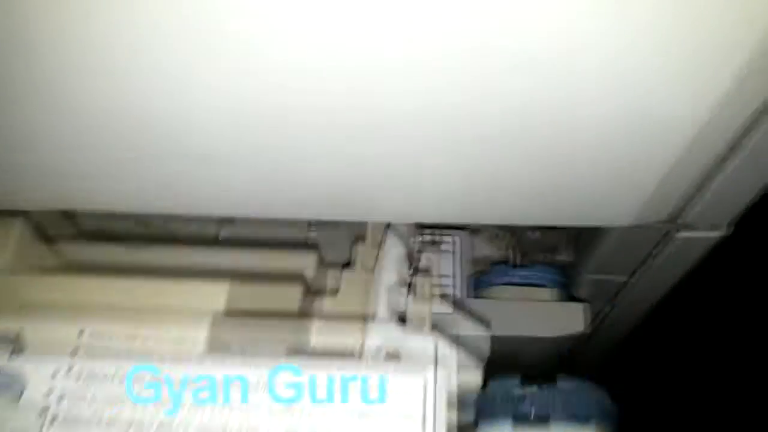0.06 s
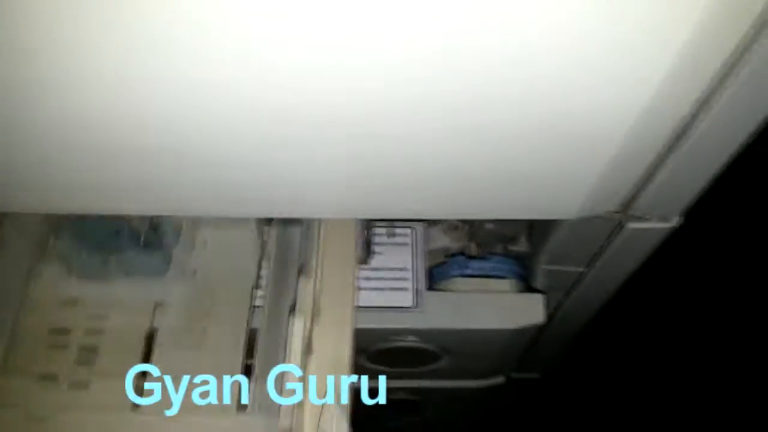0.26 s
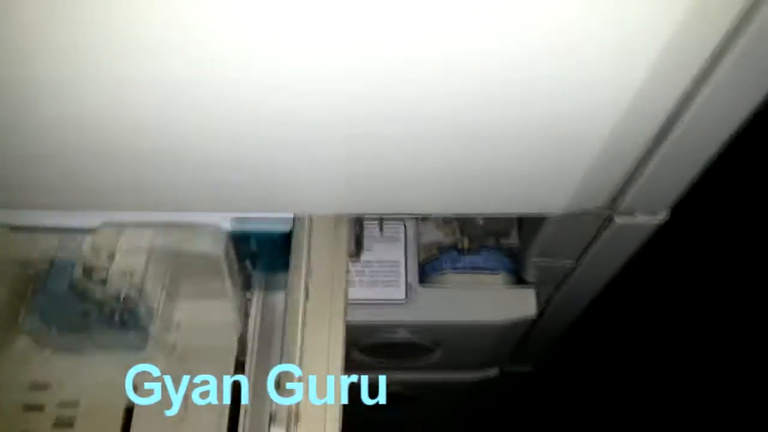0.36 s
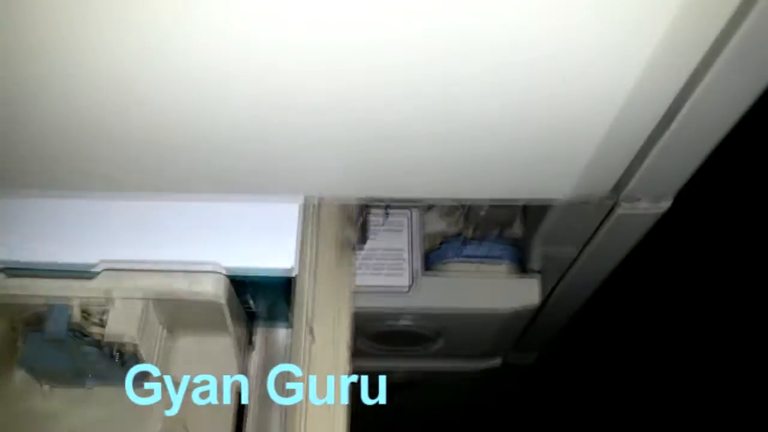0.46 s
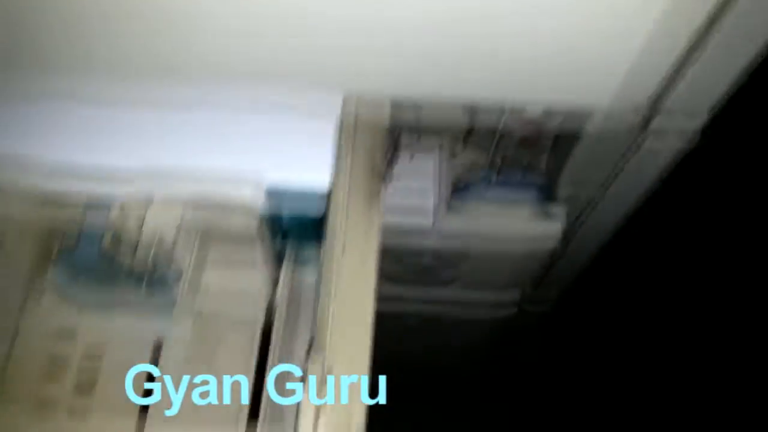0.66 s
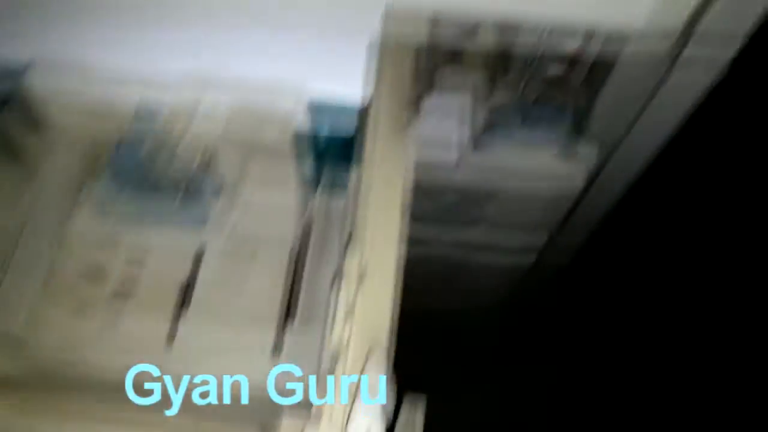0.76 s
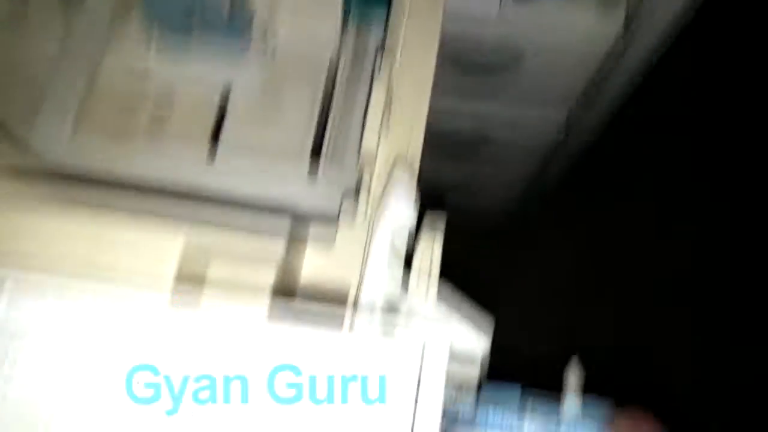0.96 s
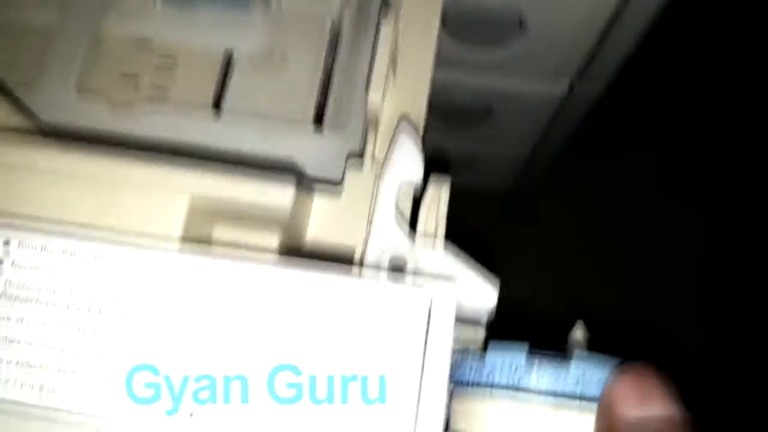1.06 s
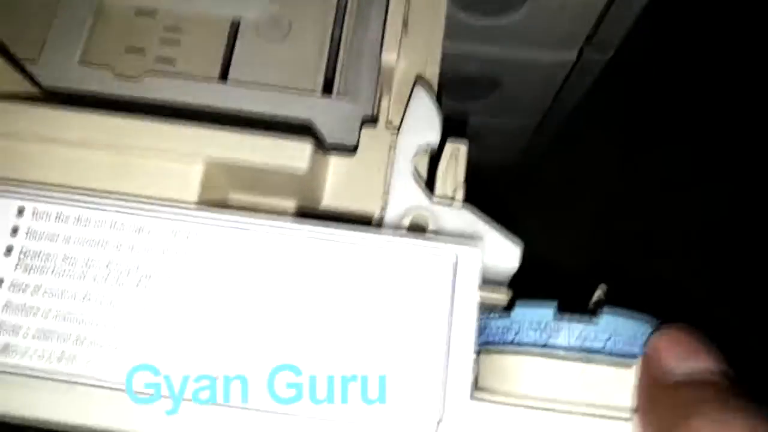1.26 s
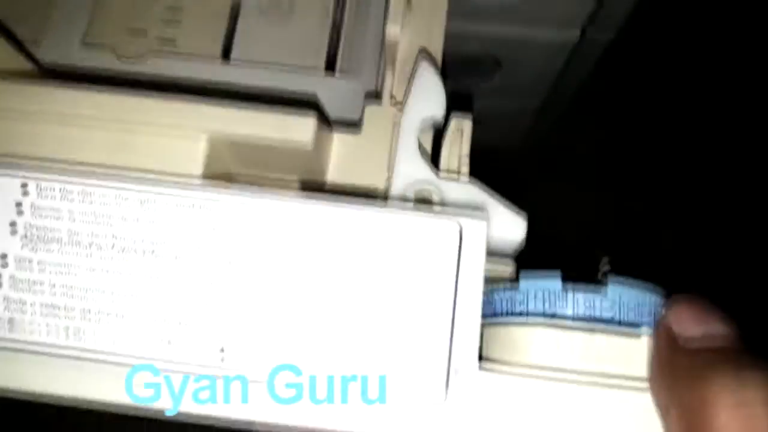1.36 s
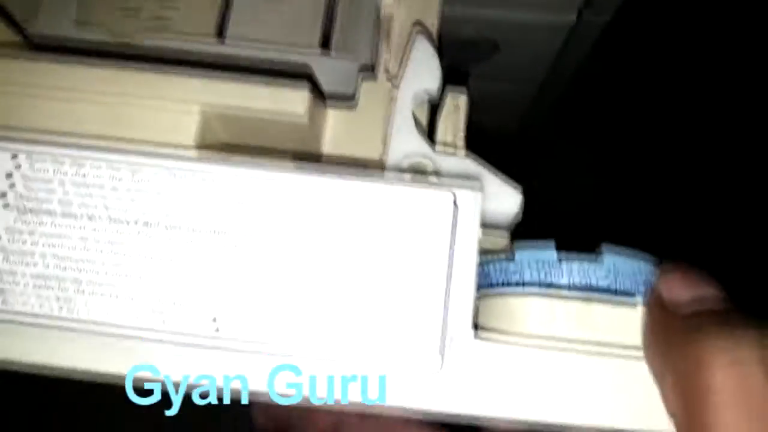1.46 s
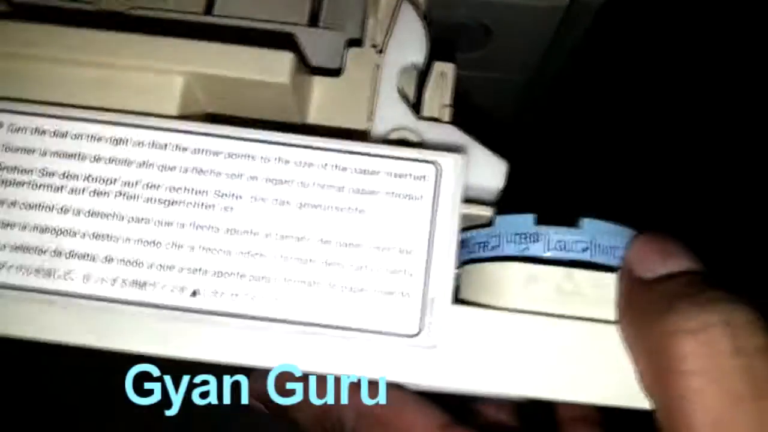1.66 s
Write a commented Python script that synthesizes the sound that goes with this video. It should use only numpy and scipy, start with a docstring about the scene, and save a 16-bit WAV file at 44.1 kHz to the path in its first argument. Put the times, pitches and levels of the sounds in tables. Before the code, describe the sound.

Plastic paper drawer slides noisily on its rails, clacks hard over a catch, then settles quietly

```python
"""In a small office, a copier's plastic paper drawer is pulled out, close to the microphone.
It rubs, rumbles and squeaks on its rails (shaped noise, rough tones), knocks (noise bursts with a ring),
clacks and thuds over a catch (decaying modes) and glides to rest with paper rustle and light ticks.
Ventilation noise and a faint motor whine lie beneath; the loudest clacks overload the microphone."""
import sys
import numpy as np
from scipy import signal
from scipy.fft import rfft, irfft, next_fast_len
from scipy.io import wavfile
from scipy.ndimage import map_coordinates

SR = 44100
rng = np.random.default_rng(int(sys.argv[2]) if len(sys.argv) > 2 else 0)


def master_out(mix):
    """Clip the mix to full scale and print it as 16-bit PCM to the path in sys.argv[1]."""
    frames = np.transpose(np.atleast_2d(mix))
    ceiling = np.clip(frames, -1, 1)
    pcm = np.round(ceiling * 32767).astype(np.int16)
    wavfile.write(sys.argv[1], SR, pcm)


N = 74970
T = np.arange(N) / SR  # time of each sample, s

# Office noise spectrum [f/Hz, density/dB]
OFFICE_COLOUR = [(15, -47), (25, -26), (50, -11), (70, -4), (98, -4.5), (135, -0.5), (167, -24), (195, -7),
                 (237, -6), (529, -12), (600, -13.5), (1060, -27), (2000, -19), (4000, -31.5), (8000, -43),
                 (13800, -31), (15000, -56)]
# Steady hum and motor lines [f/Hz, rms level/dB]
HUM = [(102.3, -57.5), (200, -59), (269.2, -59), (538.3, -62), (1077, -66.5), (1620, -67.5), (3235, -71.5),
       (4856, -73), (7278, -81), (9706, -79)]
OFFICE_DB, HUM_DRIFT_RAD = -51.5, 1

# Mean level of the rubbing on the rails [t/s, level/dB]
RUB_LEVEL = [(0, -32), (.08, -33.5), (.19, -27.5), (.25, -26.5), (.33, -19.5), (.38, -20.5), (.445, -21.5),
             (.475, -29), (.53, -31), (.58, -37), (.655, -41.5), (.69, -50.5), (.78, -50), (.86, -45),
             (.95, -53), (1.1, -55.5), (1.38, -55.5), (1.7, -60)]
# Level of the tray's rumble [t/s, level/dB]
RUMBLE_LEVEL = [(0, -37.5), (.2, -32.5), (.33, -40), (.43, -29), (.5, -38.5), (.64, -38), (.74, -49.5),
                (.92, -52), (1.08, -54.5), (1.25, -62.5), (1.7, -55)]
# Rubbing spectrum before the tray's resonances [f/Hz, density/dB]
RUB_COLOUR = [(150, -28), (250, -15), (292, -12.5), (761, -2), (829, -2), (888, -2.5), (2130, 0),
              (3100, -9), (5750, -25), (7560, -23.5), (8670, -31.5), (12200, -25), (15000, -34.5)]
# Rumble spectrum [f/Hz, density/dB]
RUMBLE_COLOUR = [(30, -70), (60, -27), (95, -4), (140, -10.5), (170, 0), (205, -8.5), (300, -10.5),
                 (600, -13.5), (2000, -66)]
# Resonances of the plastic tray [f/Hz, width/Hz, gain/dB]
TRAY = [(636.3, 45, 1), (735, 13, 2.5), (927, 70, -0.5), (1184, 84, -7.5), (1337, 13, -3), (1770, 13.3, -4),
        (2143, 17, -12), (2515, 13.3, 5), (3000, 40, -21), (3580, 180, -8.5), (7680, 170, 4)]
SLIPS_PER_S, SLIP_DB, SLIP_SPREAD_DB, RUB_WOBBLE_DB = 700, -5.5, 5, 1.5

# Level of the paper stack's rustle [t/s, level/dB]
RUSTLE_LEVEL = [(.74, -64), (.775, -57.5), (.83, -52), (.87, -59.5), (.93, -62), (1.1, -71.5), (1.7, -68)]
# Rustle spectrum [f/Hz, density/dB]
RUSTLE_COLOUR = [(1500, -12), (2600, 4.5), (4300, 5), (5500, -7), (7100, 3), (8800, -7), (11500, -4),
                 (15000, -12)]

# Tray against rails [t/s, level/dB, lower edge f/Hz, upper edge f/Hz, noise t60/s, ring f/Hz]
KNOCKS = [(.001, -25.5, 308, 2500, 0.14, 756), (0.094, -29.5, 1940, 6000, 0.18, 2800),
          (0.155, -26.5, 2030, 6500, 0.053, 2690), (0.177, -27.5, 1850, 5560, 0.067, 3250),
          (0.1919, -19.5, 1900, 8000, 0.035, 3160), (0.2038, -16.5, 684, 4800, 0.11, 1745),
          (0.2282, -16.5, 700, 9000, 0.073, 2054), (0.2804, -14.5, 930, 9200, 0.056, 2220),
          (.326, -20.5, 600, 14000, 0.055, 890), (.341, -21, 3000, 12000, 0.013, 3770),
          (0.3485, -18, 2200, 14000, 0.004, 2480), (0.399, -22.5, 500, 2940, 0.039, 1620),
          (0.4329, -15.5, 485, 2780, 0.073, 1172), (.492, -24, 1200, 8600, 0.098, 2253),
          (0.611, -32.5, 895, 2950, 0.054, 2120), (0.807, -30, 520, 1970, 0.043, 810),
          (0.846, -50, 493, 2400, 0.074, 1410), (0.982, -31, 1320, 3000, 0.081, 2470),
          (1.048, -48.5, 903, 3040, 0.047, 1300), (1.399, -47, 980, 2840, 0.069, 1426),
          (1.549, -37, 710, 1800, 0.1, 577), (1.641, -40.5, 1110, 2600, 0.084, 1343),
          (1.664, -33.5, 1300, 2880, 0.067, 1960), (1.673, -39.5, 1270, 2850, 0.046, 1340)]
# Knock spectrum before the tray's resonances and the band edges [f/Hz, density/dB]
KNOCK_COLOUR = [(100, -78), (400, -6), (700, -10.5), (1300, -7), (2500, -8), (4000, -16.5), (5700, -24.5),
                (7400, -22.5), (9000, -26.5), (15000, -20)]
KNOCK_ATTACK_S = 0.0012
KNOCK_RING_DB, KNOCK_RING_LONGER = -4, 1.1  # ring level and t60 ratio, relative to the noise

# Decay of the office's reverberation [f/Hz, t60/s]
ROOM = [(150, 0.37), (1500, 0.26), (6000, 0.18), (14000, .17)]
ROOM_DB = -8.5

# Plastic squeaks on the rails [t/s, length/s, level/dB, f/Hz]
SQUEAKS = [(0.262, 0.019, -20.5, 1130), (0.628, 0.0068, -41, 3680), (0.652, 0.026, -43, 3300),
           (.704, 0.0074, -42.5, 2850)]
SQUEAK_ROUGH_RAD = 0.17

# Bumps over the catch [t/s, swell/s, panel hold/s, panel f/Hz, panel level/dB,
# catch f/Hz, catch level/dB, scrape level/dB]
CLACKS = [(0.2955, 0.0063, .014, 752.6, -7.5, 2196, -5.5, -12.5),
          (0.3355, 0.0089, 0.0073, 747.3, -6.5, 2342, -3, -16),
          (0.365, 0.0059, .009, 789, -8, 2416, -15.5, -39),
          (.385, .003, .002, 774, -13.5, 2226, -27, -29.5)]
# Modes of the catch; each bump shifts all f by one ratio [f before the shift/Hz, relative level/dB, t60/s]
CATCH_MODES = [(1524, -7.5, 0.13), (2228, -2.5, 0.096), (2060, -10, 0.068), (3007, -16.5, 0.096),
               (3540, -21.5, .06), (3802, -21.5, 0.026)]
# Scrape spectrum [f/Hz, density/dB]
SCRAPE_COLOUR = [(150, -18), (500, -27), (900, -2), (2300, 0), (3000, 1), (3800, 0.5), (5000, -13.5),
                 (7000, -9), (9000, -33), (12500, -14.5), (15500, -36)]
PANEL_T60_S, SCRAPE_T60_S = 0.034, 0.06
MODE_FLUTTER_DB, MODE_ROUGH_RAD = 0.8, 0.25

# Low thuds of the tray on the catch [t/s, level/dB, f/Hz, t60/s]
THUDS = [(.336, -39, 41.6, .05), (0.346, -24, 167.2, 0.14), (0.4, -23, 167.5, 0.073),
         (.43, -29.5, 114.5, 0.16)]
THUD_ATTACK_S = 0.012

# Small sharp plastic ticks [t/s, level/dB]
TICKS = [(0.6573, -30), (0.741, -43), (.765, -52)]
# Tick spectrum [f/Hz, density/dB]
TICK_COLOUR = [(1000, -14), (3000, 3), (5300, -35), (7000, 1), (8300, -5.5), (9900, 12), (11200, 4),
               (12300, 5), (15000, -7)]
TICK_ATTACK_S, TICK_T60_S = 0.00062, 0.022

# Microphone: overload amplitude, sharpness of the limiting, band limit
CLIP_TOP, CLIP_HARDNESS, TOP_HZ = 1.03, 17, 15644


def amp(db):
    """Level: decibels express the logarithm of an amplitude ratio."""
    return 10 ** (np.asarray(db) / 20)


def unit(x):
    """Normalization: division by the root mean square gives rms 1."""
    return x / np.sqrt(np.mean(x ** 2) + 1e-20)


def along(points, hz):
    """Logarithmic interpolation: (f, value) points are joined on a log-frequency axis."""
    f, value = np.transpose(points)
    return np.interp(np.log(hz + 1), np.log(f + 1), value)


def curve(points):
    """Linear interpolation: (t, value) points are read at every sample."""
    return np.interp(T, *np.transpose(points))


def wobble(rate):
    """Random modulation: a smooth curve through normal deviates, rate knots a second."""
    return map_coordinates(rng.standard_normal(2048), [T * rate], mode="mirror")


def filtered(x, response):
    """Linear filtering: the spectrum is multiplied by a response of frequency."""
    size = next_fast_len(N + SR // 2)
    spectrum = rfft(x, size) * response(np.fft.rfftfreq(size, 1 / SR))
    return irfft(spectrum, size)[:N]


def noise(response):
    """Coloured noise: white noise filtered by a response, at rms 1."""
    return unit(filtered(rng.standard_normal(N), response))


def colour(points):
    """Spectral envelope: (f/Hz, level/dB) points become an amplitude response."""
    return lambda hz: amp(along(points, hz))


def tray_body(hz):
    """Modal superposition: the tray's resonances add to a flat response."""
    response = 1
    for centre, width, db in TRAY:
        damping = 1j * hz * width
        response = response + amp(db) * damping / (centre * centre - hz * hz + damping)
    return response


def burst(start, attack, t60, hold=0):
    """Transient contact: the envelope rises straight, holds, then decays exponentially."""
    rise = np.clip((T - start) / attack, 0, 1)
    decay_time = np.maximum(T - start - attack - hold, 0)
    return rise * amp(-60 * decay_time / t60)


def tone(hz, start=0, phase=0):
    """Simple harmonic motion: a sine from a start time, with an added phase in radians."""
    return np.sin(2 * np.pi * hz * (T - start) + phase)


def office():
    """Broadband and tonal sources: ventilation noise joins slightly unsteady motor lines."""
    out = amp(OFFICE_DB) * noise(colour(OFFICE_COLOUR))
    for hz, db in HUM:
        drift = HUM_DRIFT_RAD * wobble(rate=8.1)
        out += amp(db) * np.sqrt(2) * tone(hz, phase=drift)  # sqrt 2 turns rms into peak
    return out


def slide():
    """Friction excitation: tiny slips on the rails excite the tray's resonances."""
    slip_times = rng.random(N) < SLIPS_PER_S / SR
    signs = rng.choice([-1, 1], N)
    sizes = amp(SLIP_SPREAD_DB * np.minimum(rng.exponential(size=N), 3))
    slips = slip_times * signs * sizes
    friction = rng.standard_normal(N) + amp(SLIP_DB) * unit(slips)
    rub = unit(filtered(friction, lambda hz: colour(RUB_COLOUR)(hz) * tray_body(hz)))
    return rub * amp(curve(RUB_LEVEL) + RUB_WOBBLE_DB * wobble(rate=51))


def rumble():
    """Whole-body vibration: the moving tray radiates low-frequency noise."""
    return amp(curve(RUMBLE_LEVEL)) * noise(colour(RUMBLE_COLOUR))


def rustle():
    """Superposed small contacts: the paper stack's noise swells as the drawer slows."""
    return amp(curve(RUSTLE_LEVEL)) * noise(colour(RUSTLE_COLOUR))


def knocks():
    """Impact excitation: light parts lack bass, softer contacts are duller, and each rings one small part."""
    out = np.zeros(N)
    for start, db, low_hz, high_hz, t60, ring_hz in KNOCKS:
        def response(hz):
            low_ratio = (hz / low_hz) ** 2
            band = low_ratio / np.hypot(1, low_ratio) / (1 + (hz / high_hz) ** 4)
            return colour(KNOCK_COLOUR)(hz) * tray_body(hz) * band

        out += amp(db) * burst(start, KNOCK_ATTACK_S, t60) * noise(response)
        ring = burst(start, KNOCK_ATTACK_S, t60 * KNOCK_RING_LONGER) * tone(ring_hz, start)
        out += amp(db + KNOCK_RING_DB) * ring
    return out


def room(x):
    """Reverberation: convolution with a noise tail in which each frequency decays at its own rate."""
    hz, t, z = signal.stft(rng.standard_normal(SR // 2), SR, nperseg=256)
    decay = amp(-60 * t / along(ROOM, hz)[:, None])
    tail = signal.istft(z * decay, SR, nperseg=256)[1]
    return signal.fftconvolve(x, tail / np.linalg.norm(tail))[:N]  # tail of unit energy


def squeaks():
    """Stick-slip oscillation: brief tones swell and fade with a rough phase."""
    out = np.zeros(N)
    for start, length, db, hz in SQUEAKS:
        swell = np.sin(np.pi * np.clip((T - start) / length, 0, 1))
        out += amp(db) * swell * tone(hz, phase=SQUEAK_ROUGH_RAD * wobble(rate=130))
    return out


def chatter(hz, start):
    """Intermittent contact: rattling keeps a mode's level and phase unsteady."""
    flutter = amp(MODE_FLUTTER_DB * wobble(rate=250))
    return flutter * tone(hz, start, MODE_ROUGH_RAD * wobble(rate=220))


def catch():
    """Forced and free vibration: each bump scrapes, drives the panel while it lasts and rings the catch."""
    out = np.zeros(N)
    reference_hz = CATCH_MODES[1][0]  # the strongest mode sets the catch's pitch
    for start, swell, hold, panel_hz, panel_db, catch_hz, catch_db, scrape_db in CLACKS:
        out += amp(panel_db) * burst(start, swell, PANEL_T60_S, hold) * chatter(panel_hz, start)
        for hz, mode_db, t60 in CATCH_MODES:
            mode = chatter(hz * catch_hz / reference_hz, start)
            out += amp(catch_db + mode_db) * burst(start, swell, t60) * mode
        scrape = noise(colour(SCRAPE_COLOUR))
        out += amp(scrape_db) * burst(start, swell, SCRAPE_T60_S) * scrape
    return out


def thuds():
    """Low-frequency resonance: the jolt sets the loaded tray booming in decaying sines."""
    out = np.zeros(N)
    for start, db, hz, t60 in THUDS:
        out += amp(db) * burst(start, THUD_ATTACK_S, t60) * tone(hz, start)
    return out


def ticks():
    """Short impulses: thin, bright snaps of small plastic parts have a fast rise and decay."""
    out = np.zeros(N)
    for start, db in TICKS:
        out += amp(db) * burst(start, TICK_ATTACK_S, TICK_T60_S) * noise(colour(TICK_COLOUR))
    return out


def scene():
    """Superposition: all sources add; the hits also excite the room."""
    hits = knocks() + squeaks() + catch() + ticks()
    reverberation = amp(ROOM_DB) * room(hits)
    return (office() + slide() + rumble() + rustle() + hits + reverberation + thuds())[None]


def record(dry):
    """Saturation and band limiting: the microphone overloads on peaks and passes nothing above TOP_HZ."""
    overload = np.abs(dry[0] / CLIP_TOP) ** CLIP_HARDNESS
    clipped = dry[0] / (1 + overload) ** (1 / CLIP_HARDNESS)
    return filtered(clipped, lambda hz: hz < TOP_HZ)[None]


dry = scene()
out = record(dry)
master_out(out)
```